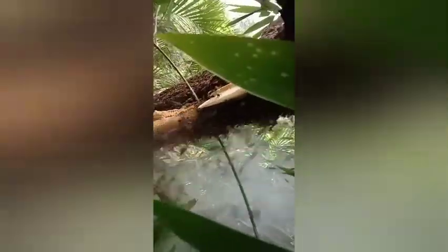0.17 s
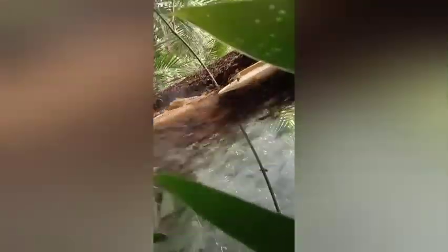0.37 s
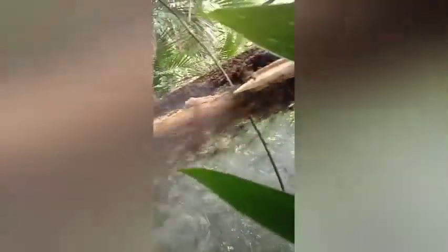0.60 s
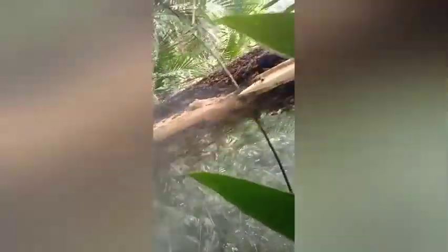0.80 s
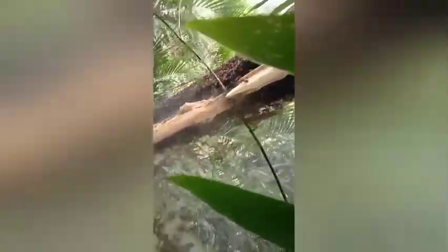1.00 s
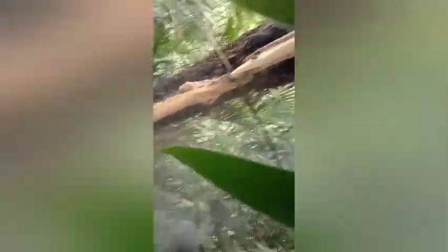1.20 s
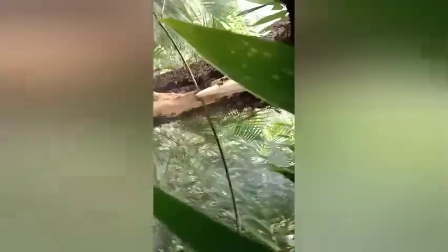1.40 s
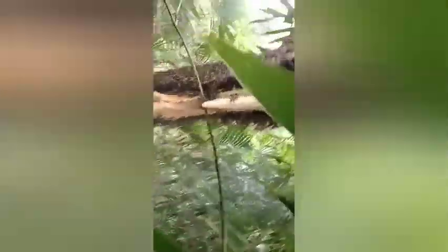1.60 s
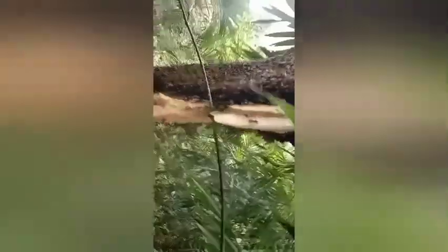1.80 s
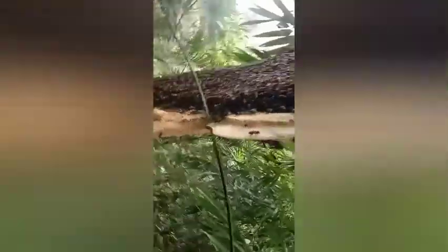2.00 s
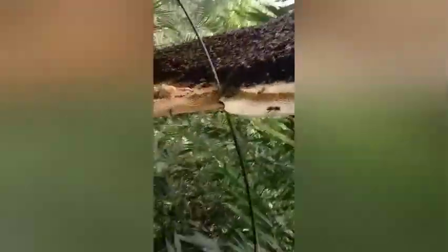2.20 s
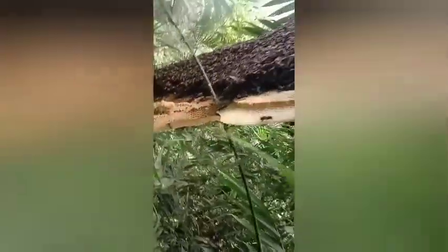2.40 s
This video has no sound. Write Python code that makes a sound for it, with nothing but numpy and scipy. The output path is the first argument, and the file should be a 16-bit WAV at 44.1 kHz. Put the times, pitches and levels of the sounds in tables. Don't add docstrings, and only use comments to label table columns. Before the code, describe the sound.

A colony of large bees buzzes outdoors, quiet at first, swelling by 0.3 s into a dense low rasp with high hiss, fullest around 0.6 s. Near bees hum past in overlapping low tones, strongest from 0.3 to 1.3 s. At 1.36 s a loud, short, deep knock hits the branch, then small dry ticks scatter until 2.45 s as the buzz thins unevenly. Close phone microphone, faint handling rumble.

```python
import sys
import numpy as np
from scipy import signal
from scipy.io import wavfile
from scipy.ndimage import uniform_filter1d

SR = 44100
rng = np.random.default_rng(int(sys.argv[2]) if len(sys.argv) > 2 else 0)


def convert_level_to_amplitude(level_db):
    exponent = np.asarray(level_db, float) / 20
    return 10 ** exponent


def transcribe(signal):
    frames = np.atleast_2d(signal).T
    limited = np.clip(frames, -1, 1)
    pcm = np.round(limited * 32767).astype(np.int16)
    wavfile.write(sys.argv[1], SR, pcm)


N = 108045
FULL_CROWD_DB = -29.5


def evened(x):
    return x / np.sqrt(np.mean(x ** 2, -1, keepdims=True) + 1e-20)


def curve(table, column):
    rows = np.array(table, float)
    return np.interp(np.arange(N) / SR, rows[:, 0], rows[:, column])


def drift(count, per_s):
    block = 256
    smooth = max(int(SR / block / per_s), 1)
    points = uniform_filter1d(rng.standard_normal((count, N // block + 2)), smooth, axis=1)
    points = evened(uniform_filter1d(points, size=3, axis=1))
    return np.array([np.interp(np.arange(N) / block, np.arange(len(p)), p) for p in points])


def smoothed(grid, bins, frames):
    return uniform_filter1d(uniform_filter1d(grid, size=bins, axis=-2), size=frames, axis=-1)


def coloured(x, table, patchy_db, tilt_db):
    hz, t, z = signal.stft(x, SR, nperseg=512, noverlap=384)
    table_hz, table_db = np.transpose(table)
    shape_db = np.interp(np.log(hz + 1), np.log(table_hz + 1), table_db, left=-62, right=-90)[:, None]
    patches = smoothed(rng.standard_normal(z.shape), 8, 16)
    weakness = np.clip(-shape_db / 20, 0, 1)
    valley_db = weakness * np.interp(t, np.arange(N) / SR, tilt_db)
    z = z * convert_level_to_amplitude(shape_db + valley_db + patchy_db * patches / patches.std())
    return evened(signal.istft(z, SR, nperseg=512, noverlap=384)[1][:N])


def add(mix, s, sound):
    part = mix[round(s * SR):][:len(sound)]
    part += sound[:len(part)]


# time in seconds, crowd level in dB,
# how far the phone's noise filter opens the weak bands in dB.
CROWD_LEVEL = [(0., -40, -6), (.09, -38, -8.5), (.2, -34, -4), (.3, -29.5, -1), (.61, -28, -0.5),
               (.9, -29, 0), (1.13, -31, 1.5), (1.64, -31, 3), (1.9, -33, 0), (2., -33.5, -1),
               (2.08, -34.5, -0.5), (2.15, -36.5, -2.5), (2.19, -34, -0.5), (2.3, -35, 0),
               (2.38, -36.5, -1), (2.45, -37, 2)]
# frequency in Hz, strength in dB per Hz.
RASP_TONE = [(150, -13), (330, -17.5), (500, -10), (1300, -3.5), (1780, -8.5), (2100, -16.5), (3400, -18.5),
             (4300, -29)]
# frequency in Hz, strength in dB per Hz.
HISS_TONE = [(3500, -36), (4300, -6), (5670, 6.5), (7740, 0.5), (9400, -5), (12000, 0.5), (14500, 5.5),
             (15800, 6)]


def crowd(count=40):
    wing_hz, wing_spread, stroke_spread_db = 128.42, .12, 6
    rate = wing_hz * (1 + wing_spread * rng.uniform(-1, 1, (count, 1)) + .03 * drift(count, 6.))
    turns = np.cumsum(rate, 1) / SR + rng.random((count, 1))
    beats = np.diff(np.floor(turns), axis=1, prepend=0) > 0
    size = convert_level_to_amplitude(2.5 * drift(count, 24.4)) * rng.choice([-1., 1.], (count, 1))
    strokes = evened((beats * size).sum(0) * convert_level_to_amplitude(stroke_spread_db * rng.standard_normal(N)))
    air = rng.standard_normal((2, N)) * convert_level_to_amplitude(0.13 * drift(2, 15.) + .5 * drift(2, 40.))

    over_db = curve(CROWD_LEVEL, 1) - FULL_CROWD_DB
    opening_db = curve(CROWD_LEVEL, 2)
    rasp_tilt_db = opening_db + 1.2 * np.minimum(over_db + 8.5, 0)
    hiss_tilt_db = 0.23 * over_db + 0.49 * opening_db

    air_share = 0.82
    rasp_source = np.sqrt(1 - air_share) * strokes + np.sqrt(air_share) * air[0]
    rasp = coloured(rasp_source, RASP_TONE, patchy_db=1.14, tilt_db=rasp_tilt_db)
    hiss = coloured(0.32 * strokes + air[1], HISS_TONE, patchy_db=0.94, tilt_db=hiss_tilt_db)
    return convert_level_to_amplitude(FULL_CROWD_DB) * (convert_level_to_amplitude(-3 + 0.8 * over_db) * rasp + convert_level_to_amplitude(-2 + 1.12 * over_db) * hiss)


def rumble():
    top_hz, level_db = 105, -76.5
    band = signal.butter(2, [0.47 * top_hz, top_hz], "band", fs=SR, output="sos")
    low = signal.sosfilt(band, rng.standard_normal(N))
    lumpy = evened(low * convert_level_to_amplitude(5.7 * drift(1, 2.7)[0]))
    return lumpy * convert_level_to_amplitude(level_db + 0.5 * (curve(CROWD_LEVEL, 1) - FULL_CROWD_DB))


# nearest moment in seconds, level in dB,
# octave of the wing beat in Hz, wing beat against its octave in dB.
FLY_BYS = [(.03, -47.5, 267, -2.5), (0.128, -49, 254, -25), (.26, -41, 250, -14), (.3, -38, 242, -17),
           (0.351, -42, 255, -5.5), (0.442, -44, 222, -3), (0.511, -40.5, 263, -3), (.56, -38.5, 250, -4.5),
           (.62, -37, 230, -6.5), (.71, -36.5, 270, -12), (.77, -42, 270, -16), (0.839, -34, 258, -19),
           (.93, -41, 267, -24), (0.999, -40, 262, -2), (1.071, -37.5, 255, -21), (1.119, -38, 250, -9.5),
           (1.168, -41.5, 228, -9), (1.23, -35, 267, -17), (1.3, -39.5, 266, -6), (1.44, -45.5, 240, 0),
           (1.521, -51, 260, -0.5), (1.582, -44, 262, -9), (1.64, -36.5, 255, -22),
           (1.701, -43.5, 232, -16), (1.77, -38.5, 262, -6), (1.86, -39, 263, -19),
           (1.981, -45.5, 240, -12.5), (2.071, -50.5, 240, -19), (2.25, -46, 240, -12.5),
           (2.41, -49.5, 245, -9.5)]


def near_bees():
    pass_s, glide, wander_depth = 0.032, .02, 0.0439
    upper_db, fuzz_db, mate_db, mate_spread = -13, -10.5, -8., .08
    hum, near_power = np.zeros(N + SR), np.zeros(N + SR)
    lead = SR // 5
    t = np.arange(-lead, lead) / SR
    wander = drift(2 * len(FLY_BYS), 40.)[:, :len(t)].reshape(len(FLY_BYS), 2, -1)
    chance = rng.random((len(FLY_BYS), 4, 2, 1))
    for (s, db, octave_hz, beat_db), w, p in zip(FLY_BYS, wander, chance):
        apart = np.array([[0], [mate_spread]]) * np.sign(250 - octave_hz) * (.5 + p[3])
        beat_hz = octave_hz / 2 * (1 + apart)
        moving_hz = beat_hz * (1 - glide * np.tanh(t / pass_s) + wander_depth * w)
        phase = 2 * np.pi * (np.cumsum(moving_hz, 1) / SR + p[0])
        swell = np.sqrt(2) * convert_level_to_amplitude(db) * np.exp(-.5 * (t / pass_s) ** 2)
        upper = np.sin(3 * phase + 6 * p[1]) + np.sin(4 * phase + 6 * p[2])
        bees = np.sin(2 * phase) + convert_level_to_amplitude(beat_db) * np.sin(phase) + convert_level_to_amplitude(upper_db) * upper
        pair = convert_level_to_amplitude(np.array([[0], [mate_db]])) * bees
        add(hum, s, swell * pair.sum(0))
        add(near_power, s, swell ** 2)
    band = signal.butter(4, [105., 420.], "band", fs=SR, output="sos")
    fuzz = evened(signal.sosfilt(band, rng.standard_normal(N)))
    return hum[lead:][:N] + convert_level_to_amplitude(fuzz_db) * np.sqrt(near_power[lead:][:N]) * fuzz


# start in seconds, peak level in dB, ring in Hz.
TICK_ROWS = [(0.543, -32, 1410), (0.769, -30, 1360), (0.967, -33, 1340), (1.356, -16, 1240),
             (1.361, -32, 690), (1.386, -18, 1040), (1.411, -17.5, 1320), (1.46, -22, 1000),
             (1.59, -20.5, 1560), (1.84, -19.5, 1520), (1.935, -24, 1180), (1.981, -21.5, 1280),
             (2.047, -33, 1270), (2.105, -21, 1210), (2.171, -29, 2600), (2.176, -25, 1230),
             (2.181, -18, 1220), (2.251, -29, 1370), (2.328, -29, 970), (2.406, -31, 1388),
             (2.428, -23.5, 1160)]


def ticks():
    level_db, t60_s, snap_db, rise_s = 2, .012, -12., .001
    out, t = np.zeros(N), np.arange(1024) / SR
    band = signal.butter(2, [600., 2600.], "band", fs=SR, output="sos")
    snaps = evened(signal.sosfilt(band, rng.standard_normal((len(TICK_ROWS), 1024))))
    for (s, db, hz), snap in zip(TICK_ROWS, snaps):
        ring = np.sin(2 * np.pi * hz * t) + convert_level_to_amplitude(snap_db) * snap
        fade = convert_level_to_amplitude(db + level_db - 60 * t / t60_s)
        add(out, s, fade * np.minimum(t / rise_s, 1) * ring)
    return out


# start in seconds, peak level in dB,
# starting pitch in Hz, ending pitch in Hz, time to fade by 60 dB in seconds.
BRANCH_KNOCKS = [
    (1.3553, -.5, 330., 76., .052),
    (1.3565, -14., 420., 380., .03),
    (1.3595, -19., 760., 640., .03),
    (1.4, -26., 130., 78., .15),
]


def knocks():
    rise_s, glide_s = 0.0022, 0.004
    out, t = np.zeros(N), np.arange(SR // 4) / SR
    for s, db, hz_start, hz_end, t60_s in BRANCH_KNOCKS:
        turns = hz_end * t + (hz_start - hz_end) * glide_s * (1 - np.exp(-t / glide_s))
        rise = 1 - np.exp(-(t / rise_s) ** 2)
        add(out, s, convert_level_to_amplitude(db - 60 * t / t60_s) * rise * np.sin(2 * np.pi * (turns - .2)))
    return out


def scene():
    return (crowd() + rumble() + near_bees() + ticks() + knocks())[None]


def denoised(x):
    threshold_db, slope, deepest_db = -69., 0.58, -14.
    z = signal.stft(x, SR, nperseg=512, noverlap=384)[2]
    power = smoothed(abs(z) ** 2, 5, 9)
    under_db = np.minimum(10 * np.log10(abs(power) + 1e-14) - threshold_db, 0)
    z = z * convert_level_to_amplitude(np.maximum(slope * under_db, deepest_db))
    return signal.istft(z, SR, nperseg=512, noverlap=384)[1][:, :N]


def band_limit(x):
    return signal.sosfilt(signal.butter(12, 16850, fs=SR, output="sos"), x)


def record(dry):
    low_cut = signal.butter(2, 55., "high", fs=SR, output="sos")
    cut = signal.sosfilt(low_cut, denoised(dry))
    band_edge = signal.firwin(2047, 15510, window=("kaiser", 12), fs=SR)
    mix = signal.oaconvolve(cut, band_edge[None], "same")
    return band_limit(mix)


dry = scene()
out = record(dry)
transcribe(out)
```